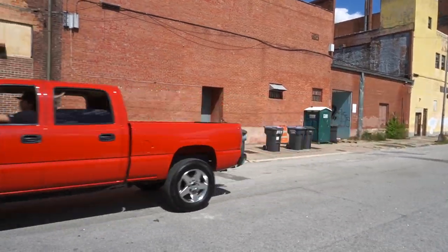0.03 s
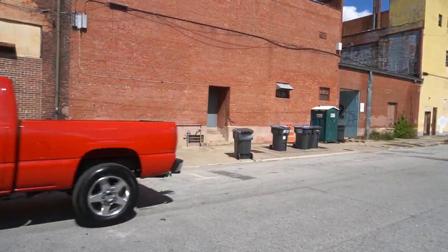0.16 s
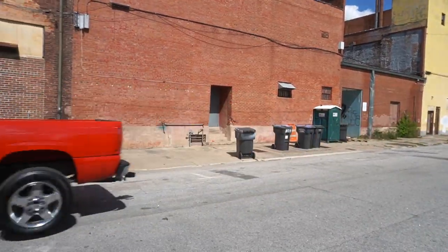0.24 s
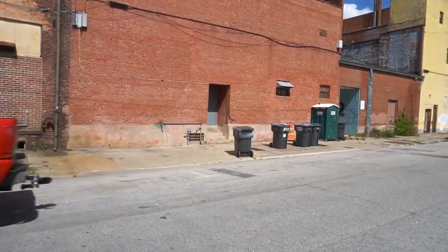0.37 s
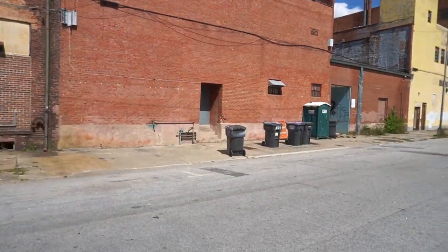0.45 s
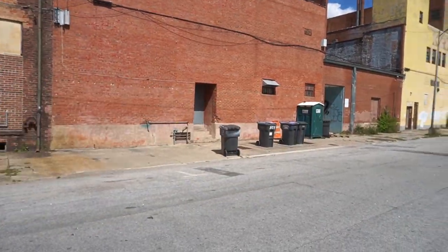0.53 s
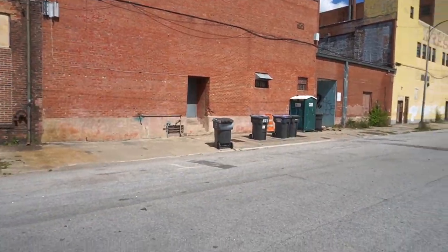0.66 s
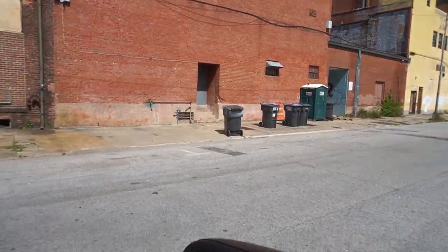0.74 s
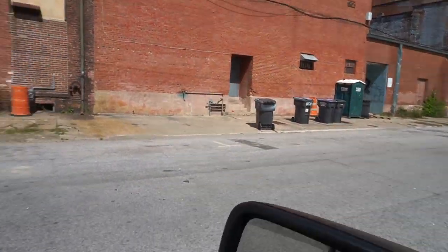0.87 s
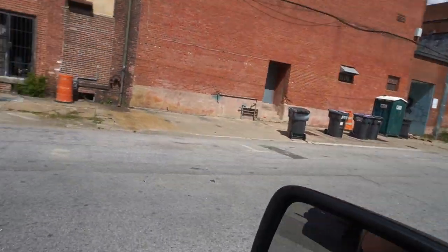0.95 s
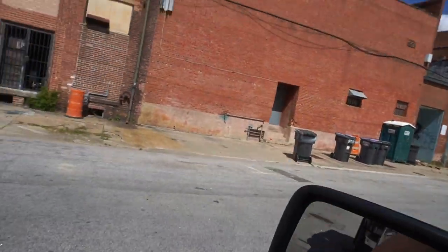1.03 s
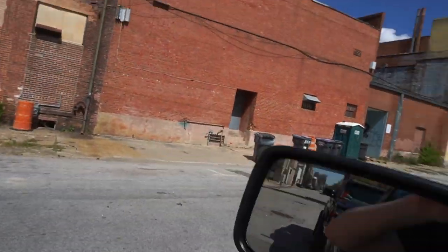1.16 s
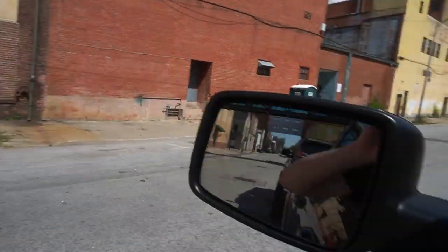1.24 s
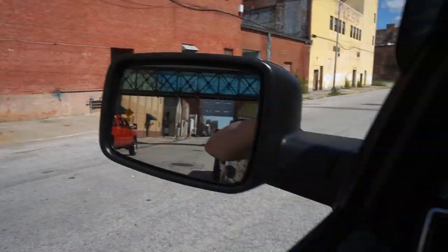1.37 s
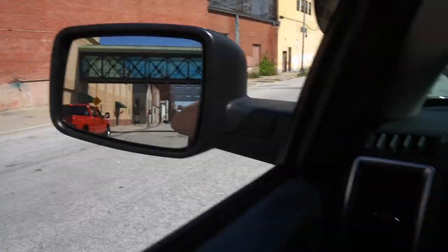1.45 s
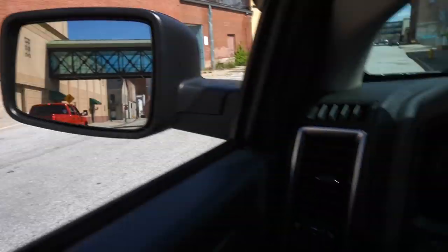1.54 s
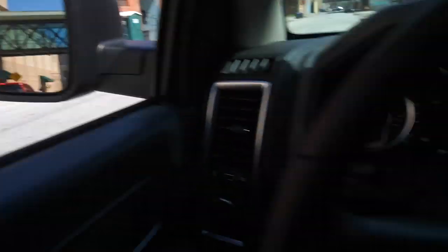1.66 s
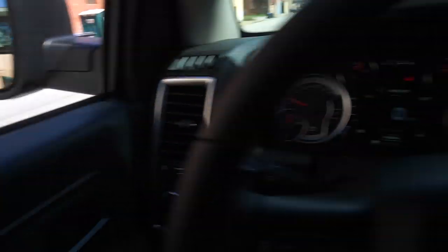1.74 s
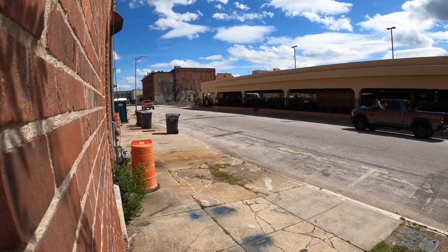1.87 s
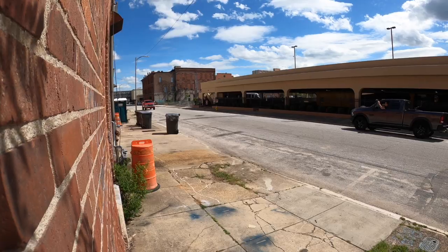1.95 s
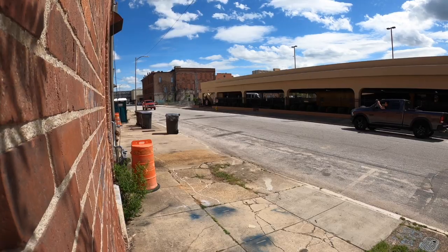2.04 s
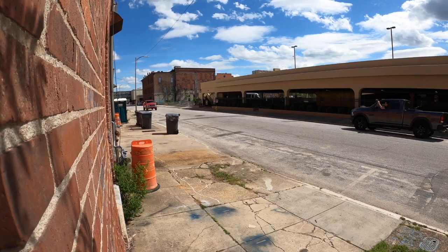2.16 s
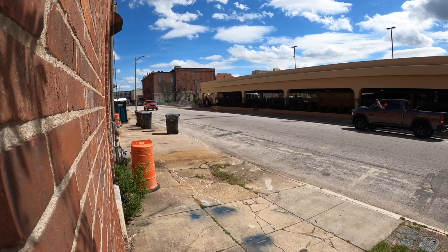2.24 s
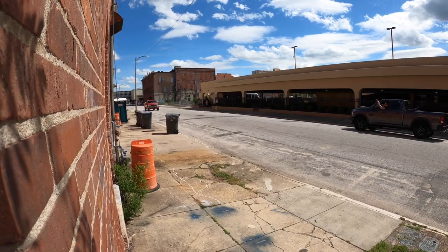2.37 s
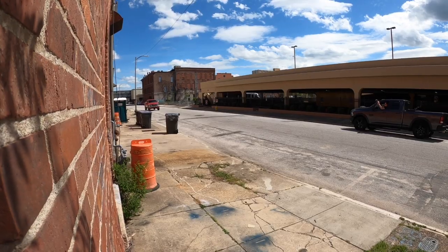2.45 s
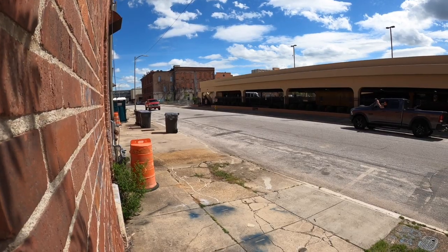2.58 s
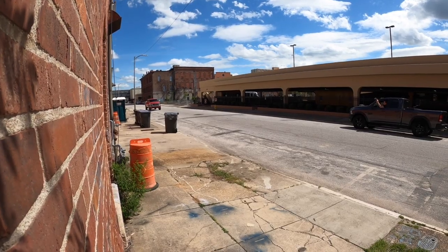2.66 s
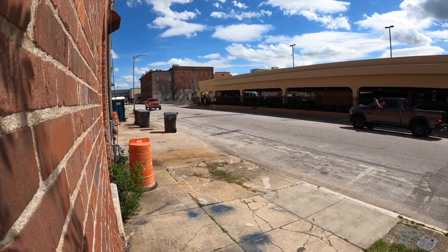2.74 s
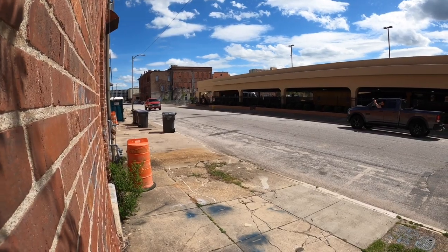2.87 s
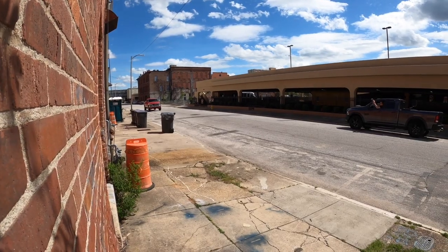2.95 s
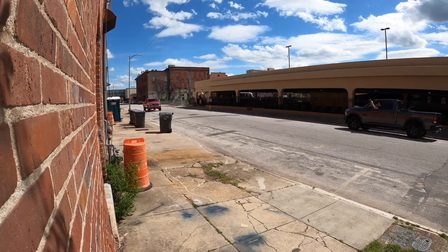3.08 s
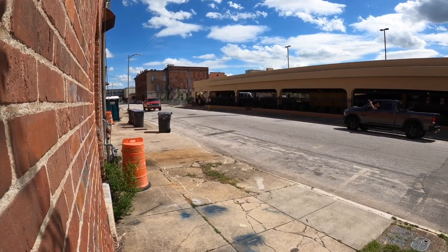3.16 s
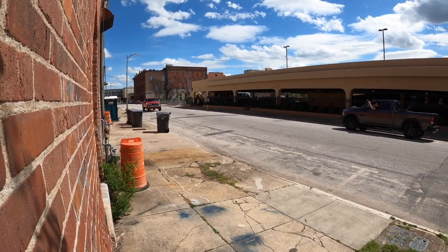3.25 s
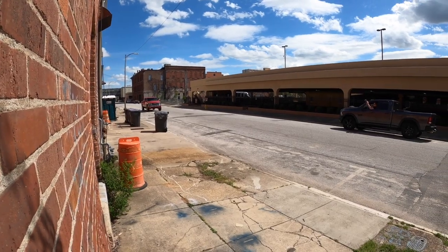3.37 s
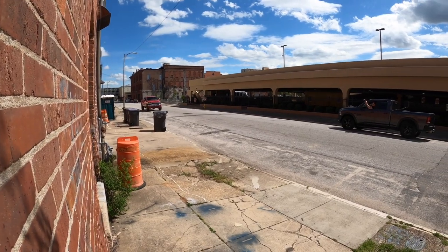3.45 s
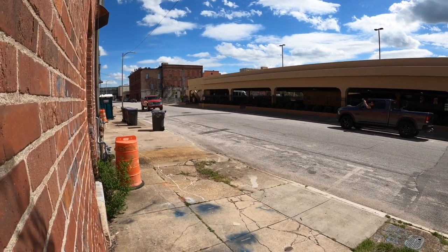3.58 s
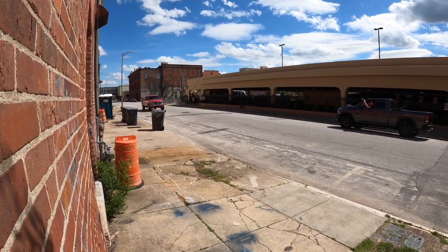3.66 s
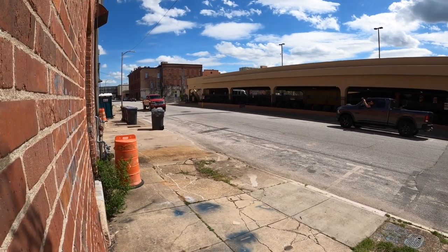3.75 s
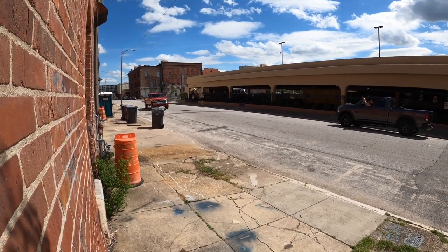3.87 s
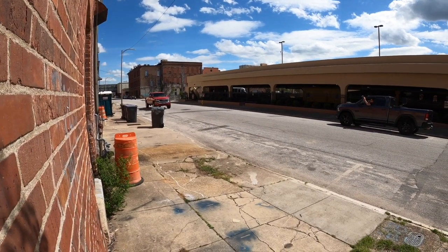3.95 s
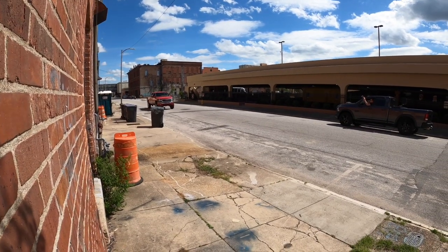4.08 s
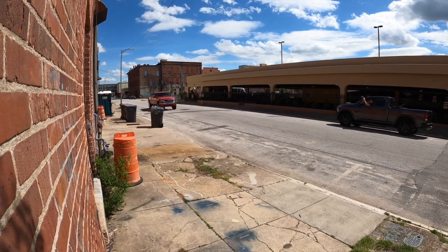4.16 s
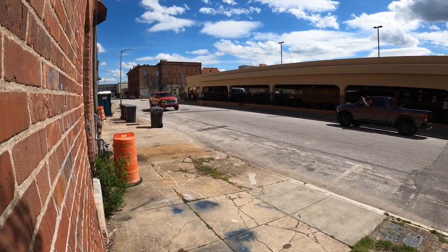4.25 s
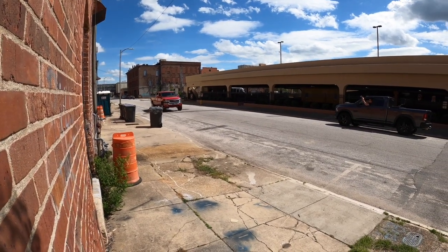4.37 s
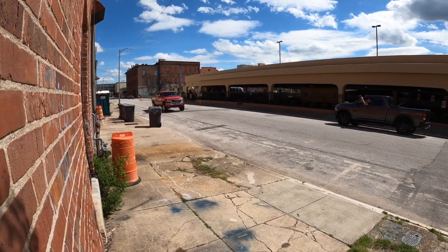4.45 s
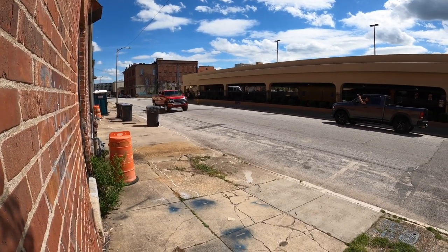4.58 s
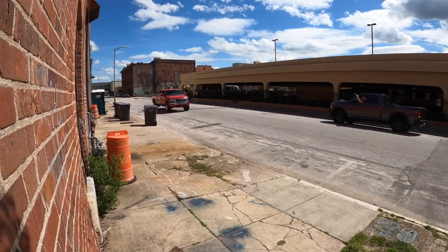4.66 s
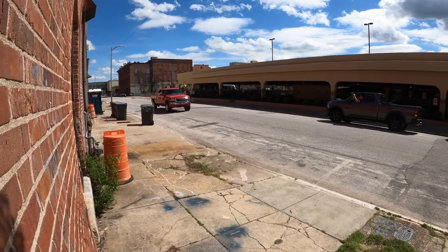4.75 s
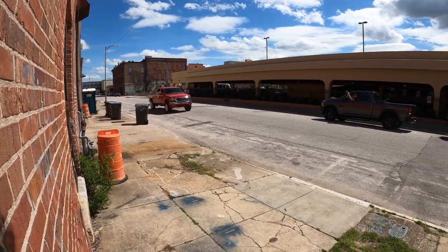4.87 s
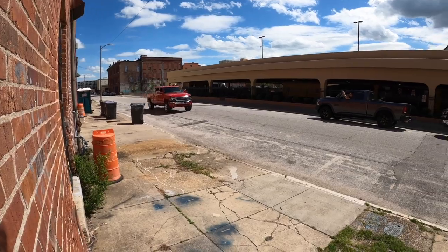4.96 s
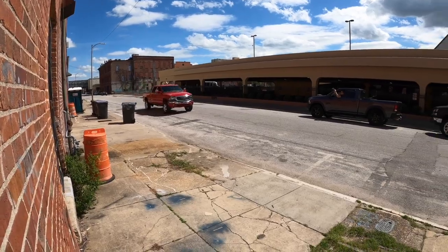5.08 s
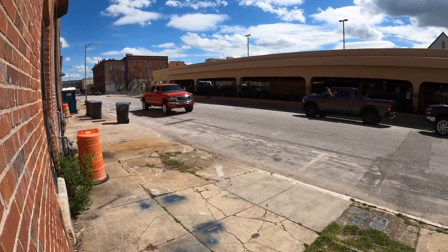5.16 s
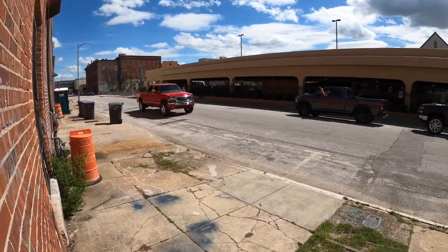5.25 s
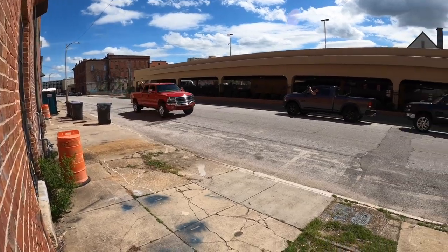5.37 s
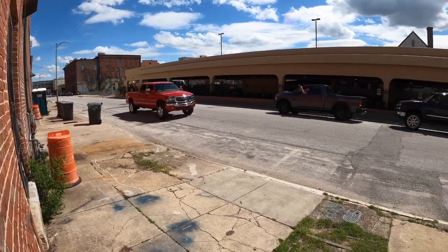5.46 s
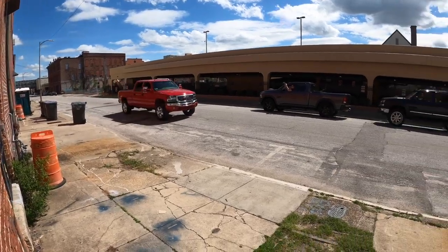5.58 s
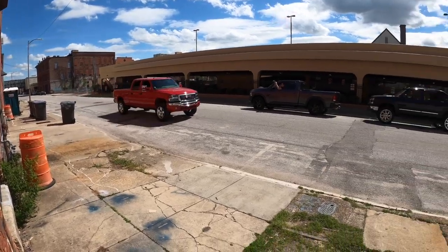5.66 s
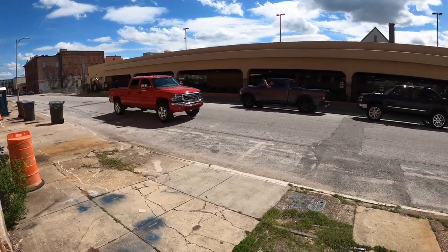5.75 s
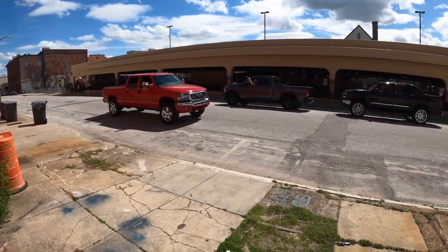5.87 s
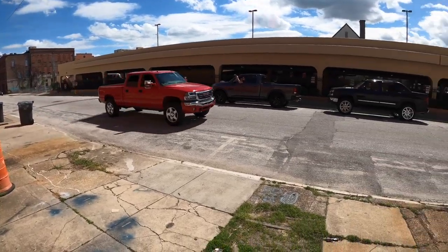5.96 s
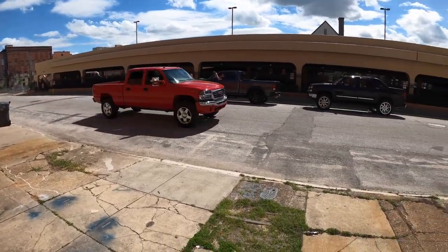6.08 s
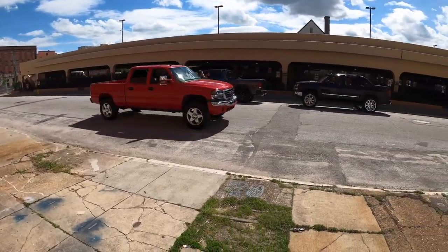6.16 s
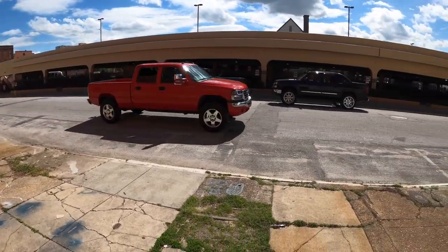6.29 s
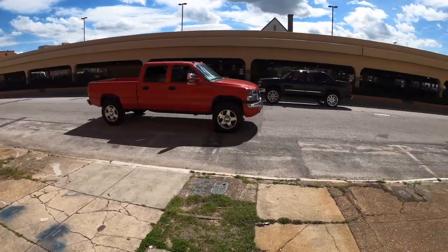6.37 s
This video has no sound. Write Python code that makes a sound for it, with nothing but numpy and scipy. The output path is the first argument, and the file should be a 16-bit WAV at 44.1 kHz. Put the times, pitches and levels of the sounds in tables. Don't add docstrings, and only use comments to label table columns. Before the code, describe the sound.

Turbo diesel truck growls off past an open cab window, cuts to a street where it nears with swelling drone and climbing whine.

```python
import sys
import numpy as np
from scipy import signal
from scipy.fft import rfft, irfft, next_fast_len
from scipy.io import wavfile
from scipy.ndimage import uniform_filter1d, map_coordinates

SR = 44100
rng = np.random.default_rng(int(sys.argv[2]) if len(sys.argv) > 2 else 0)


def invert_db(x):
    u = np.asarray(x, float) / 20
    return 10 ** u


def bounce(signal):
    frames = np.transpose(np.atleast_2d(signal))
    limited = np.clip(frames, -1, 1)
    pcm = np.round(limited * 32767).astype(np.int16)
    wavfile.write(sys.argv[1], SR, pcm)


N = 283122
TIME = np.arange(N) / SR
CHANGE_S = 1.8696


def unit(x):
    return x / np.sqrt(np.mean(x ** 2) + 1e-20)


def along(points, hz):
    f, v = np.transpose(points)
    return np.interp(np.log(hz + 1), np.log(f + 1), v)


def curves(rows):
    s, *cols = np.transpose(rows)
    return [np.interp(TIME, s, c) for c in cols]


def wobble(rate_hz):
    return map_coordinates(rng.standard_normal(int(N * rate_hz / SR) + 4), [TIME * rate_hz])


def bumps(rows, size=lambda v: v):
    return sum(size(v) * np.exp(-((TIME - s) / length) ** 2) for s, v, length in rows)


def filtered(x, response):
    m = next_fast_len(N + SR // 2)
    return irfft(rfft(x, m) * response(np.fft.rfftfreq(m, 1 / SR)), m)[..., :N]


def fuzzy(hz, width_hz, steady=0.):
    knots = rng.standard_normal((2, int(N * width_hz / SR) + 4))
    re, im = (np.interp(TIME * width_hz, np.arange(len(k)), k) for k in knots)
    carrier = np.exp(2j * np.pi * np.cumsum(hz + 0 * TIME) / SR)
    return unit(np.real((steady + re + 1j * im) * carrier))


# f/Hz, correlation [0-1]
LIKENESS = [(200, 1), (410, 0.94), (790, 0.92), (1500, 0.83), (2850, 0.67), (5400, 0.29), (12000, 0.22)]


def stereo_noise(spectrum):
    def response(hz):
        angle = np.arccos(np.clip(along(LIKENESS, hz), 0, 1)) / 2
        return invert_db(along(spectrum, hz)) * [np.cos(angle), np.sin(angle)]

    pair = filtered(rng.standard_normal((2, N)), response)
    return pair / np.std(pair[0])


# f/Hz, t60/s
WALL_DECAY = [(200, .5), (2000, 0.47), (5000, 1), (10000, 0.21)]


def walls(x):
    hz, t, z = signal.stft(rng.standard_normal((2, SR * 3 // 4)), SR, nperseg=256)
    tail = signal.istft(z * invert_db(-60 * t / along(WALL_DECAY, hz)[:, None]), SR, nperseg=256)[1]
    tail = tail / np.linalg.norm(tail[0])
    return signal.fftconvolve(x[:1], tail, axes=1)[:, :N] * [[1], [.6]]


def echo_shift(crank, level_hz, drop):
    return drop * (level_hz - curves(crank)[0])


# f/Hz, width/Hz, level/dB
PIPE_MODES = [(99.5, 34.4, -6.5), (160.6, 38.5, 0.5), (234.8, 33, -6.5), (288, 88, -13.5)]
CYLINDER_DB = [4, -2.5, 1.6, 0.6, -3, 1.5, 0, 2]


def pipe_boom(turns):
    at = np.flatnonzero(np.diff(np.floor(turns)))
    chance = rng.standard_normal((int(N * 100 / SR), 2))[:len(at)]
    sizes = invert_db(np.resize(CYLINDER_DB, len(at)) + 2.5 * chance[:, 0])
    late = np.clip(at + (0.00058 * SR * chance[:, 1]).astype(int), 0, N - 1)

    def pipe(f):
        total = 0
        for k, (centre, width, db) in enumerate(PIPE_MODES):
            ring = 1j * f * width / (centre * centre - f * f + 1j * f * width)
            total = total + (-1) ** k * invert_db(db) * ring
        return total / (1 + 1j * f / 300)

    pulses = np.bincount(late, sizes - 1.11 * sizes.mean(), N)
    boom = unit(filtered(pulses, pipe))
    return unit(1.13 * boom + walls(boom[None])[0])


# multiple of firing rate, level re second order/dB
UPPER_ORDERS = [(3, -23), (4, -20.5), (5, -28.5), (6, -28), (8, -25.5)]
# t/s, level/dB, length/s
ECHO_BEATS = [(.13, 5.5, .04), (.4, 1, 0.094), (.7, -6, 0.12), (3.5, 4.5, .12), (3.84, -7, .08),
              (4.14, 4.5, 0.055), (4.32, -5.5, 0.1), (4.6, 6, 0.047), (5.05, 3, 0.096), (5.35, -4, .08),
              (6.26, 4, .07)]


def firing_orders(firing_hz, note_db, first_db):
    beats_db = bumps(ECHO_BEATS)
    first = invert_db(first_db + 0.93 * wobble(6) - 0.88 * beats_db) * fuzzy(firing_hz, 9.1, steady=2.3)
    second = fuzzy(2 * firing_hz, 18, steady=2.6)
    upper = sum(invert_db(db) * fuzzy(k * firing_hz, 3.5 * k, steady=1.9) for k, db in UPPER_ORDERS)
    return first + invert_db(note_db + beats_db) * (second + upper)


# f/Hz, density/dB per Hz
ROAR_SPECTRUM = [(150, -51.5), (260, -1), (350, 1), (480, -6.5), (750, -4), (1100, -9), (1800, -27),
                 (4000, -63.5), (9000, -120)]
# f/Hz, density/dB per Hz
RUSH_SPECTRUM = [(300, -60), (700, -9.5), (1100, -2), (1600, -2.5), (2300, -4.5), (3300, -8.5),
                 (4300, -12.5), (5500, -25), (8000, -37), (14000, -120)]


def gas_flow(turns, roar_db, rush_db, hiss_db, hiss_spectrum):
    throb = 1 + 0.17 * np.cos(2 * np.pi * turns) + 0.11 * np.cos(np.pi * turns / 2)
    roar = invert_db(roar_db + 0.96 * wobble(14)) * throb * stereo_noise(ROAR_SPECTRUM)
    rush = invert_db(rush_db + 3 + 0.28 * wobble(16)) * stereo_noise(RUSH_SPECTRUM)
    hiss = invert_db(hiss_db + 2.6 + .8 * wobble(8.2)) * throb * stereo_noise(hiss_spectrum)
    return roar + rush + hiss


def exhaust(crank, laws, hiss_spectrum, settle_db=0):
    firing_hz, near_db, note_db = curves(crank)
    boom_db, roar_db, rush_db, hiss_db, first_db = (db + grows * near_db for db, grows in laws)
    turns = np.cumsum(firing_hz) / SR
    bass = firing_orders(firing_hz, note_db, first_db) + invert_db(boom_db - 4) * pipe_boom(turns)
    gas = gas_flow(turns, roar_db, rush_db, hiss_db, hiss_spectrum)
    return gas + invert_db(settle_db) * bass * [[1], [.02]], hiss_db


# t/s, level/dB, length/s
GLINTS = [
    (1.21, -8, .04),
    (1.4, 3.5, .05),
    (0.532, 5.5, 0.013),
    (0.679, 7, 0.006),
    (6.4, 6, .02),
    (3.375, 4.5, 0.019),
    (6.145, 6.5, .01),
]


def turbine(rows, shift_hz, octave_db):
    blade_hz, tone_db, smear = curves(rows)
    smear = np.clip(smear, 0, 1)
    blade_hz = uniform_filter1d(blade_hz, size=SR // 9, mode="nearest")

    def path():
        direct = np.sqrt(1 - smear) * fuzzy(blade_hz, 45, steady=1.3)
        return direct + np.sqrt(smear) * fuzzy(blade_hz + shift_hz, 380)

    flutter = invert_db(tone_db + 1.8 * wobble(20) + bumps(GLINTS))
    tone = flutter * np.array([path(), .45 * path()])
    octave = fuzzy(2 * blade_hz + shift_hz, 400)
    return tone + invert_db(octave_db) * octave * [[1], [.4]]


# f/Hz, density/dB per Hz
DRONE_SPECTRUM = [(15, -35), (33, -15.5), (80, 1.5), (170, -8.5), (260, -10.5), (400, -27), (900, -59.5),
                  (3000, -120)]


def idling(lines, drone_db):
    hum = sum(invert_db(db) * fuzzy(hz, width_hz, steady=1.65) for hz, width_hz, db in lines)
    return hum * [[1], [.03]] + invert_db(drone_db) * stereo_noise(DRONE_SPECTRUM)


# t/s, f/Hz, level/dB
IDLE_LINE = [(.7, 319, -57.5), (.9, 331.4, -35), (1.3, 330, -39.5), (1.55, 314.5, -40.5), (1.7, 333, -69)]


def idle_line():
    buzz_hz, buzz_db = curves(IDLE_LINE)
    return invert_db(buzz_db) * fuzzy(buzz_hz, 3.3, steady=2.0)


# f/Hz, density/dB per Hz
GUST_SPECTRUM = [(4, -29.5), (11, -3), (25, -19), (60, -31.5), (200, -61), (800, -120)]
# t/s, level/dB, length/s
GUSTS = [
    (.0, -20.5, .04),
    (.17, -15.5, .03),
    (.34, -20, 0.1),
    (.56, -22.5, 0.065),
    (.78, -16.5, 0.13),
    (1.0, -12, 0.041),
    (1.1, -14, 0.043),
    (1.25, -19, 0.1),
    (1.4, -12, 0.067),
    (1.66, -17, .09),
]


def wind():
    thump = unit(filtered(rng.standard_normal(N), lambda hz: invert_db(along(GUST_SPECTRUM, hz))))
    size = np.sqrt(abs(uniform_filter1d(thump ** 2, size=SR // 8)))
    calm_db = -37.5
    return (invert_db(calm_db) + bumps(GUSTS, invert_db)) * unit(thump / (.3 + size))


# t/s, peak level/dB, f/Hz, t60/s, octave level/dB
PINGS = [
    (.995, -48, 7700, 0.054, -28),
    (1.041, -33, 8050, 0.063, -34.5),
    (1.098, -55, 13200, 0.032, -40),
    (1.186, -35, 7240, 0.047, -21),
]
# t/s, level/dB, length/s, centre f/Hz, width/Hz
SCUFFS = [(0.57, -33, 0.019, 5000, 2980), (0.685, -45.5, .001, 7870, 3000), (0.85, -52, .006, 12000, 3910),
          (0.941, -58, 0.0071, 14000, 2000), (1.39, -63, 0.017, 13000, 1000),
          (1.532, -54, .002, 8000, 2000), (1.515, -60, 0.017, 13000, 994), (1.595, -62, .02, 13500, 1000),
          (1.79, -51, .015, 5200, 490), (1.845, -38.5, .004, 2600, 910), (2.626, -48, 0.001, 7940, 3020),
          (2.657, -54, 0.0011, 8960, 3950), (2.712, -57, 0.012, 6500, 805), (2.74, -48.5, .04, 5010, 397)]


def rattles():
    x = np.zeros(N)
    for s, db, hz, t60_s, octave_db in PINGS:
        t = np.clip(TIME - s, 0, None)
        decay = invert_db(-60 * t / t60_s) + .28 * invert_db(-60 * t / .3)
        shape = (1 - np.exp(-t / .002)) * decay
        tone = fuzzy(hz, 450, steady=0.7) + invert_db(octave_db) * fuzzy(min(2 * hz, 15500), 300)
        x = x + invert_db(db + 2.5) * shape * tone
    noise, f = rfft(rng.standard_normal(N)), np.fft.rfftfreq(N, 1 / SR)
    for s, db, length_s, hz, width_hz in SCUFFS:
        puff = irfft(noise * np.exp(-((f - hz) / width_hz) ** 2 / 2), N)
        x = x + invert_db(db) * unit(puff) * np.exp(-((TIME - s) / length_s) ** 2)
    return x * [[1], [.3]]


# t/s, firing f/Hz, nearness/dB, exhaust note level/dB
CRANK_LEAVING = [(0.0, 97.55, 0, -18), (0.13, 92.2, -3, -15.5), (0.27, 84.8, -6, -24),
                 (0.53, 76.6, -10, -33), (0.8, 70.73, -14.5, -34), (1.2, 64.36, -17.5, -33.5),
                 (1.86, 63.5, -24.5, -51)]
# level at nearest point/dB, slope/dB per dB of nearness
CAB_LAWS = [(-11.5, 1), (-19.5, 0.76), (-24.5, 1.08), (-39, 0.7), (-24, 0.4)]
# f/Hz, density/dB per Hz
HISS_NEAR = [(2000, -84.5), (3500, -15.5), (5000, 1), (7000, -7.5), (9000, -11.5), (11000, -19.5),
             (14000, -17), (15700, -25.5)]
# t/s, blade f/Hz, level/dB, wall share [0-1]
SPOOL_DOWN = [(0.0, 4736, -24, .55), (0.21, 4515, -33, 0.3), (0.57, 3914, -28, 0.3), (0.8, 3664, -29.5, .4),
              (1.2, 3195, -42.5, .45), (1.5, 2830, -46.5, .55), (1.86, 2450, -48, .55)]
# f/Hz, width/Hz, level/dB
CAB_IDLE = [(43, 2.1, -47), (58.2, 8.8, -41.5), (83.5, 5.4, -35.5), (173, 6.9, -47)]


def leaving():
    engine, hiss_db = exhaust(CRANK_LEAVING, CAB_LAWS, HISS_NEAR)
    shift_hz = echo_shift(CRANK_LEAVING, level_hz=78, drop=4.5)
    whistle = turbine(SPOOL_DOWN, shift_hz, octave_db=hiss_db - 11)
    truck = engine + whistle + invert_db(-15.5) * walls(whistle)
    cab = idling(CAB_IDLE, drone_db=-31.5)[0] + idle_line()
    cab_air = invert_db(-64.5) * stereo_noise(HISS_NEAR)[0]
    return truck[0] + cab + wind() + cab_air


# t/s, level/dB
INTAKE_OPENING = [(1.88, -53.5), (3.18, -43), (4.09, -42), (4.77, -53), (5.0, -38), (5.38, -32),
                  (5.71, -36.5), (6.19, -29.5), (6.28, -39)]


def intake():
    level_db = curves(INTAKE_OPENING)[0] + 0.5 + 1.9 * wobble(12)
    return invert_db(level_db) * np.array([fuzzy(2850, 480), .5 * fuzzy(2500, 480)])


# f/Hz, width/Hz, level/dB
STREET_IDLE = [(41.7, 5, -26.5), (60.6, 3.6, -27.5), (73.4, 5, -26.5), (110.2, 8, -22), (153.9, 8, -26.5),
               (178.6, 4.1, -30.5), (231.2, 5, -36), (240.8, 3.4, -30)]
# f/Hz, width/Hz, level at nearest point/dB, slope/dB per dB of nearness
STANDING_WAVE = (232, 9, -24, 1.4)


def street(near_db, settle_db):
    parked = invert_db(-4 - 0.31 * near_db + settle_db) * idling(STREET_IDLE, drone_db=-25.0)
    hz, width_hz, db, grows = STANDING_WAVE
    return parked + invert_db(db + grows * near_db) * fuzzy(hz, width_hz, steady=1.5) * [[1], [.03]]


# f/Hz, level/dB
FAN_LINES = [(527, -8.5), (650, 3.5), (790, -2.5), (870, -10)]


def fan():
    on_s, off_s, rise_db_per_s, fall_db_per_s = 2.38, 3.1, 172, 27.5
    rise_db = rise_db_per_s * np.clip(on_s - TIME, 0, 1)
    fall_db = fall_db_per_s * np.clip(TIME - off_s, 0, None)
    hum = sum(invert_db(db) * fuzzy(hz, 9, steady=2.6) for hz, db in FAN_LINES)
    return invert_db(-40.5 - rise_db - fall_db) * hum * [[1], [.3]]


# t/s, firing f/Hz, nearness/dB, exhaust note level/dB
CRANK_COMING = [(1.88, 82.8, -11.5, -36.5), (2.4, 81.26, -10.5, -21), (2.7, 82.15, -9.5, -26.5),
                (2.97, 86.14, -9.5, -20), (3.84, 86.4, -8, -21.5), (4.2, 89.5, -6.5, -19.5),
                (4.6, 94.76, -5, -17), (5.3, 97.64, -2.5, -15.5), (5.7, 96, -2.5, -12),
                (6.15, 96.55, 0, -19), (6.41, 91.9, -2, -26.5)]
# level at nearest point/dB, slope/dB per dB of nearness
PAVEMENT_LAWS = [(-9.5, 1), (-25, 0.58), (-29, 0.97), (-40, 1.99), (-21.5, 0.27)]
# f/Hz, density/dB per Hz
HISS_FAR = [(2000, -76), (3500, -14), (5000, -4.5), (6500, -14), (9000, -21), (11000, -30.5),
            (13000, -36.5), (15700, -49)]
# t/s, blade f/Hz, level/dB, wall share [0-1]
SPOOL_UP = [(1.88, 3768, -42, 0.22), (2.59, 3492, -42, 0.28), (2.87, 3580, -35.5, 1),
            (3.44, 3761, -34, 0.61), (4.14, 3944, -30.5, 0.69), (4.5, 4168, -31.5, .79),
            (5.0, 4584, -28, .7), (5.35, 4704, -32, .64), (5.7, 4784, -35, 0.76), (6.19, 4720, -28.5, 0.36),
            (6.41, 4370, -36.5, 0.16)]


def coming():
    near_db = curves(CRANK_COMING)[1]
    settle_db = -6.5 * np.exp(-abs(TIME - CHANGE_S) / 0.055)
    engine, hiss_db = exhaust(CRANK_COMING, PAVEMENT_LAWS, HISS_FAR, settle_db)
    shift_hz = echo_shift(CRANK_COMING, level_hz=86.2, drop=13)
    whistle = turbine(SPOOL_UP, shift_hz, octave_db=hiss_db - 23)
    truck = engine + whistle + invert_db(-12.0) * walls(whistle) + intake()
    mid, side = truck + fan() + street(near_db, settle_db)
    treble = mid - uniform_filter1d(mid, size=40)
    lean_db = 2 + 0.13 * near_db
    lean = 1.3 * np.tanh(lean_db * np.log(10) / 40) * treble
    return np.array([mid, side + lean])


def scene():
    cut = round(CHANGE_S * SR)
    small = rattles()
    first, second = leaving() + small[0], coming() + small
    pressure_step = .2
    gap = second[0, cut] - first[cut - 1] - pressure_step
    first = first + gap * np.exp(-abs(TIME - CHANGE_S) / 0.019)
    mid, side = np.where(np.arange(N) < cut, [first, 0 * first], second)
    return np.array([mid + side, mid - side])


def roll_off(x):
    return signal.sosfilt(signal.butter(12, 15720, fs=SR, output="sos"), x)


def record(dry):
    held = dry / (1 + abs(dry / .97) ** 5) ** (1 / 5)
    return roll_off(held)


dry = scene()
out = record(dry)
bounce(out)
```